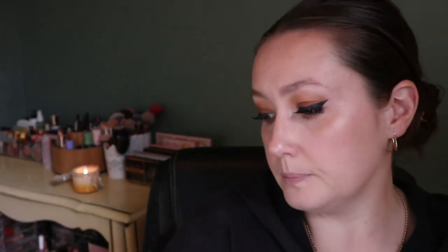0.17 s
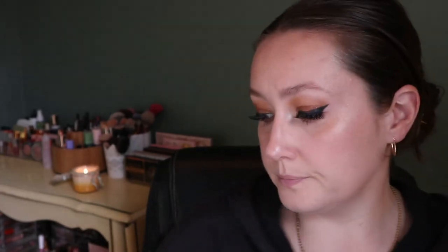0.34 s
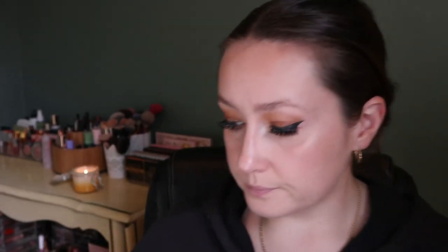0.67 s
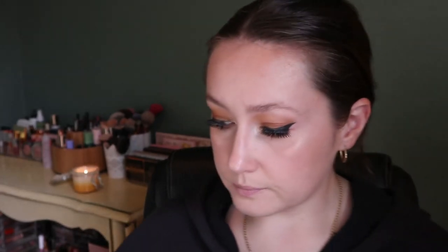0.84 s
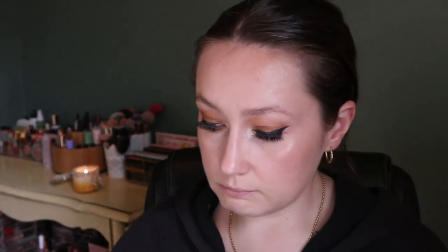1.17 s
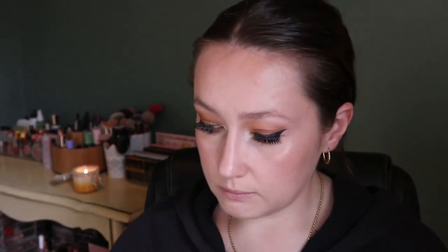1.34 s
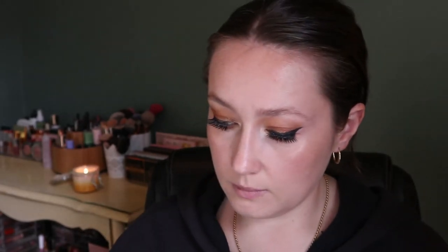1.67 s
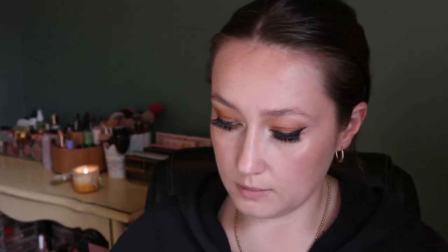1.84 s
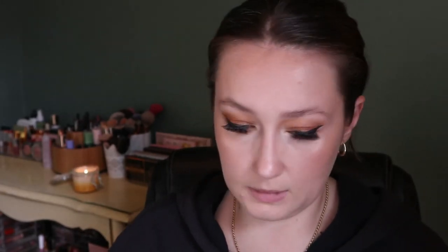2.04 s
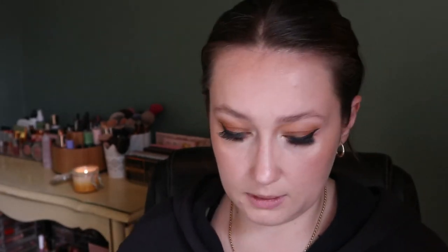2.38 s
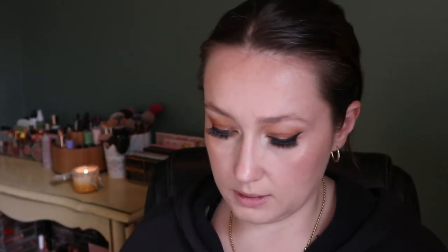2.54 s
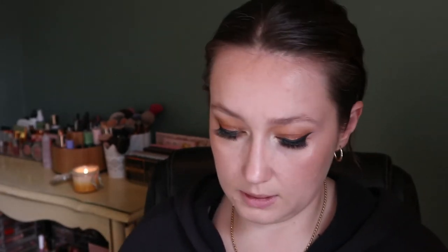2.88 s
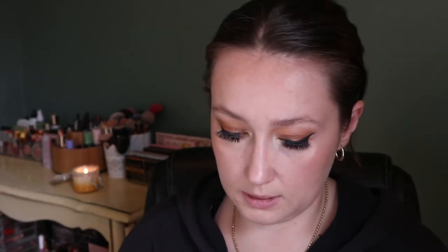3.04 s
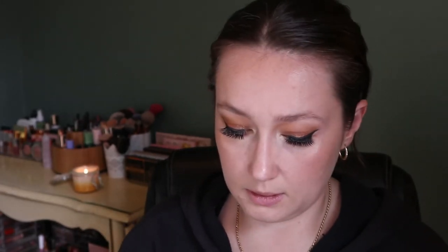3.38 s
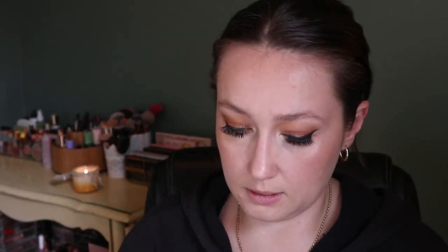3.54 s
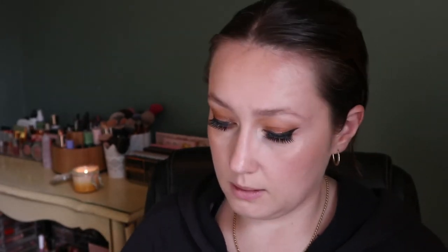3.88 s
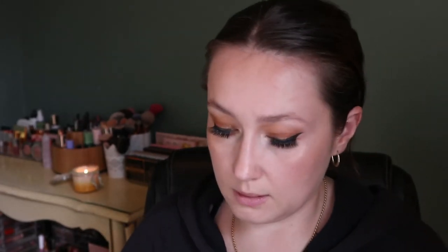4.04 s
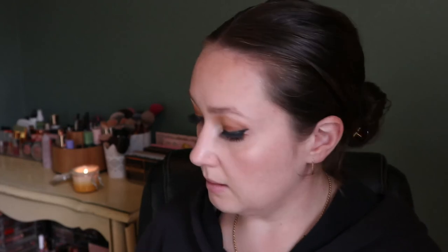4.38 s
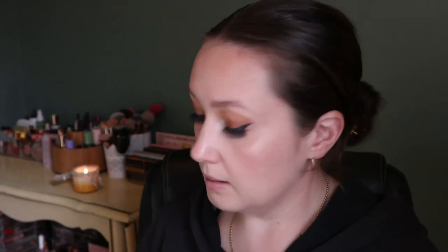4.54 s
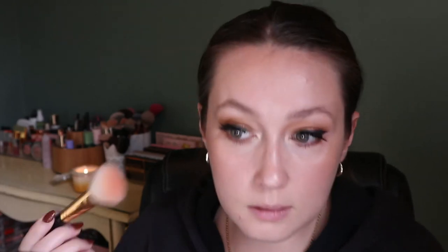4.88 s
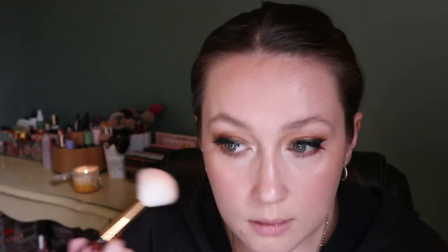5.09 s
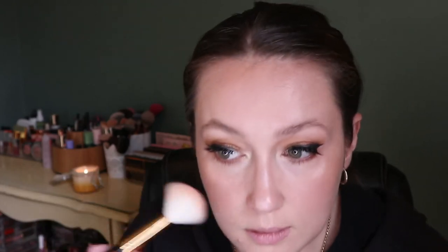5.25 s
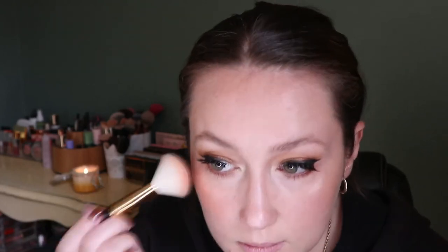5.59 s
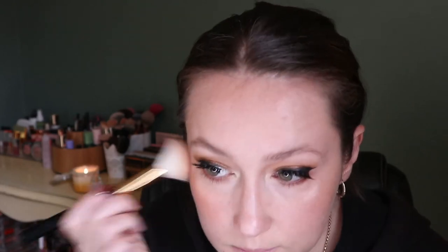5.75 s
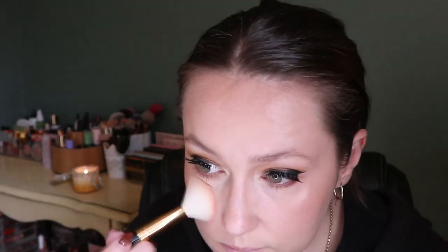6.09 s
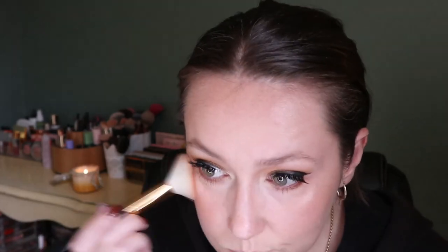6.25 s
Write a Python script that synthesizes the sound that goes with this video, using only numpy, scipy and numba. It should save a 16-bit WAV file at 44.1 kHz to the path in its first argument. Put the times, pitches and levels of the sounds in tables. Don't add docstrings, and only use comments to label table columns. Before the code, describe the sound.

In a small reverberant room with quiet ventilation hum, a case knocks twice and scrapes briefly, then a jar and tray rattle, drag and strike the table. A dull heavy blow leads to a sharp, clipped lid snap, the loudest sound. After a long quiet gap come soft nudges, two clear brush taps on a lid, a faint low chair shift with creaks, and soft pats. Close stereo microphone, lively echoes.

```python
import sys
import numpy as np
from scipy import signal
from scipy.fft import rfft, irfft
from scipy.io import wavfile
from scipy.ndimage import uniform_filter1d, minimum_filter1d
from numba import njit

SR = 44100
rng = np.random.default_rng(int(sys.argv[2]) if len(sys.argv) > 2 else 0)


def log_audio(samples):
    frames = np.atleast_2d(samples).T
    limited = np.clip(frames, -1, 1)
    pcm = np.round(limited * 32767).astype(np.int16)
    wavfile.write(sys.argv[1], SR, pcm)


def ratio(d):
    e = np.asarray(d, float) / 20
    return 10 ** e


N = 283122

# f/Hz, level/dB per Hz
HUM_SPECTRUM = [(15, -46), (25, -11.5), (90, -5), (118, 5), (146, -7), (237, -2.5), (529, -10), (673, -9.5),
                (1180, -13), (1350, -13.5), (1760, -14.5), (9020, -31.5), (15000, -47.5)]
# f/Hz, side minus mid level/dB
HUM_SIDE = [(60, -37), (110, -8), (200, -2), (380, 2.5), (700, 3.5), (1290, 3.5), (2380, 4), (4400, 6),
            (8120, 4), (15000, 9.5)]
HUM_DB, MAINS_HZ, MAINS_DB = -52.5, 120, -60.5
# f/Hz, T60/s
ROOM_T60 = [(100, 0.79), (300, 0.48), (1000, 0.63), (3000, 0.58), (7000, 0.73), (12000, 0.31)]
# f/Hz, side minus mid level/dB
PORTS_SIDE = [(60, -9), (110, -48), (200, -22), (380, -22), (700, -16.5), (1290, -14.5), (2380, -10.5),
              (4400, -1), (8120, 3.5), (15000, 8)]
# f/Hz, level/dB
MIC_RESPONSE = [(30, 4.5), (100, -6.5), (8000, 0.5), (12000, 1), (14000, -13.5), (17000, -41)]
# f/Hz, T60/s, level/dB
TABLE_BOOMS = [(126.6, 0.22, -42), (170.1, 0.18, -44)]

# f/Hz, width/Hz, level/dB
CHAIR_MODES = [(122, 7.7, 1), (314, 24, 0.5), (500, 91, -8.5), (870, 470, -7.5), (1900, 570, -23)]
SOFT_MODES = [(456, 670, -7.5), (913, 280, -1.5), (1150, 240, -1), (1700, 220, 2), (2350, 170, 0)]
BRUSH_MODES = [(471, 19, 12), (576, 184, 12), (790, 190, 1), (1197, 123, 7.5), (1650, 500, -12),
               (3050, 280, -14), (3880, 430, -35), (10400, 3000, -4)]
JAR_MODES = [(176, 17, -12), (634, 150, 3.5), (830, 229, -3), (2250, 410, -13.5), (3430, 400, -6),
             (5200, 230, -5.5)]
CASE_MODES = [(164.3, 24, 6.5), (226, 12, -0.5), (377, 24, 2.5), (560, 37, -6), (790, 54, -10),
              (1314, 1200, -9.5), (1622, 60, -1.5), (1927, 42, -1), (3400, 280, -16.5)]
TRAY_MODES = [(167, 29, 6), (343, 30, 0), (875, 90, 3), (922, 43, 8), (1834, 60, -2), (2020, 66, -2.5),
              (2900, 830, -0.5), (3400, 140, -19.5), (5070, 250, -15.5)]
LID_MODES = [(168, 35, 0.5), (560, 66, 6), (720, 260, 9.5), (933, 41, 13), (1644, 240, 1), (2480, 200, -8),
             (3050, 490, 0), (3920, 680, -16.5)]

EDGES_HZ = [90, 400, 1300, 2400, 5000, 16000]
# upper, higher, top part over mid, level/dB
CHAIR_TREBLE_DB = (-6, -8, -23)
PAT_TREBLE_DB = (-26, -21, -28)
NUDGE_TREBLE_DB = (-3.9, -11, -31.5)
BRUSH_TREBLE_DB = (-1.5, -9.5, -14.5)
JAR_TREBLE_DB = (-8, -0.93, -16)
CASE_TREBLE_DB = (-8.5, -6, -30)
TRAY_TREBLE_DB = (-3.3, 4.8, 1.5)
LID_TREBLE_DB = (1, -5, -15)
HARD_SHARE = (1, 0.33, 0.64)

# t/s, peak level/dB, weight (bass)/dB, hardness (treble)/dB
CHAIR_KNOCKS = [
    (4.953, -36.5, 4.5, 1.5),
    (4.975, -41.5, 9, 8),
    (5.0, -32.5, -4, -14),
]
PATS = [
    (6.064, -50, 9.5, 0),
    (6.304, -49, -6, 0.0041),
]
NUDGES = [
    (.608, -35, -2.5, -6),
    (.62, -36, -19.5, 3.5),
    (4.207, -43, -1, 3),
    (4.261, -39, -3.5, -5),
    (4.268, -33, -8, 3.5),
]
BRUSH_TAPS = [
    (4.459, -15, -17.5, 0),
    (4.6215, -16, -22, 0),
]
JAR_KNOCKS = [
    (1.0555, -13, -11, 0),
]
CASE_KNOCKS = [
    (.0435, -21, -9, 12.5),
    (.1015, -13, -3, -5.5),
]
TRAY_KNOCKS = [
    (.8965, -21, -10.5, 0.5),
    (1.154, -18.5, -2, 13),
    (1.403, -41.5, -23, 13.5),
    (1.586, -30.5, -6, 16),
    (1.615, -19.5, -6, 4),
    (1.6635, -10, -19, -17.5),
    (1.745, -30, -19, -5.5),
]
LID_SNAP = [
    (1.8796, 4, -14, 0),
]

# t/s, peak level/dB, ring f/Hz, ring decay/ms, top band over ring/dB
SEAT_STEPS = [
    (5.195, -42, 1750, 1.5, -30),
    (5.245, -48, 2060, 1.5, -30),
    (5.275, -53, 1750, 1.5, -28),
    (5.325, -52, 1770, 1.8, -28),
    (5.36, -52, 1650, 1.5, -30),
    (5.19, -51, 540, 9.3, -30),
]
CAP_TICKS = [(.739, -33, 1700, 0.66, -13.5), (.762, -35.5, 3580, 2, -7), (.836, -48, 3590, 1.1, -26),
             (1.77, -28.5, 3740, 2.5, -32), (1.163, -22.5, 2980, 1, -16), (.114, -20.5, 5200, 0.65, -1),
             (2.455, -33.5, 3800, 1.07, -42), (2.821, -47.5, 2020, 0.68, -31),
             (4.232, -42.5, 3680, 1.6, -27), (4.421, -44.5, 3640, 2, -17), (4.953, -45, 3700, 1.7, -5),
             (5.072, -34.5, 2080, 0.29, -27), (5.118, -33, 2100, 0.58, -37), (5.125, -54, 4560, 1.3, -25),
             (5.123, -56, 3450, 2.2, -25), (5.146, -34.5, 1780, 0.47, -34), (5.29, -57, 560, 28, -15),
             (5.29, -52, 2900, 1.5, -20), (5.469, -44, 1900, 2, -16), (5.472, -45, 3400, 0.48, -19)]
NEAR_TICKS = [(1.8, -21, 570, 1.5, -20), (1.664, -12, 850, 23, -34), (.103, -18, 380, 9.8, -29.5),
              (.104, -16.5, 794, 6, -30), (.1005, -12.5, 3240, 1, -20), (1.6, -12, 1650, 2, -7),
              (4.7, -36, 1700, 1.9, -25), (1.6635, -5, 2950, 2.6, -25), (2, -14, 2500, 1.2, -16),
              (6.064, -47, 820, 7.8, -40), (6.304, -44.5, 850, 8, -40), (4.459, -29, 10000, 0.65, -29),
              (4.6215, -29, 11500, 0.27, -33)]
NAIL_CLICKS = [
    (.0435, -14, 1250, 2.5, -30),
    (.1025, -11, 1650, 2.5, -15),
    (1.880, 1, 1620, 1.6, -25),
    (1.8815, -8, 3600, 1.2, -25),
    (2.302, -45, 9000, .3, -12),
    (2.4475, -25, 2800, .4, -24),
]

# hardest t/s, swell/s, fade/s, level/dB
CREAKS = [
    (4.999, 0.18, 0.11, -38),
    (5.13, .02, 0.18, -50.5),
    (5.26, 0.12, 0.22, -43),
    (5.49, 0.017, 0.081, -48),
]
THUMPS = [
    (4.97, 0.017, 0.34, -34.5),
    (5.15, .1, 0.098, -41.5),
    (5.47, 0.17, 1, -56),
]
# hardest t/s, swell/s, fade/s, level/dB, hardness/dB
CASE_DRAGS = [
    (.002, 0.0079, .02, -16, -18),
    (.065, 0.012, 0.13, -38.5, -9),
    (.118, 0.029, 0.039, -30.5, 26.5),
    (.17, 0.045, 0.24, -40, 1),
]
TRAY_DRAGS = [
    (0.763, 0.036, 0.66, -41, -6),
    (0.899, 0.037, 0.14, -23, 8),
    (.98, 0.11, 0.49, -35.5, -17),
    (1.058, 0.0049, 0.047, -21, 13),
    (1.166, 0.043, 0.077, -18, 4),
    (1.211, 0.035, 0.18, -35, 7),
    (1.294, 0.024, 0.053, -26.5, -14.5),
    (1.42, .05, 0.24, -51.5, 1.5),
]
TRAY_PULLS = [
    (1.59, 0.0037, 0.069, -34, 6),
    (1.62, 0.0046, 0.16, -26, 6),
    (1.668, 0.014, 0.57, -26.5, -7.5),
    (1.749, 0.015, .2, -36.5, 6),
]
# bass, upper, top part over mid, level/dB
CASE_DRAG_DB = (1, 6, -26.5)
TRAY_DRAG_DB = (-4, 0.99, -6.5)
TRAY_PULL_DB = (-13, 0, -7.5)
DRAG_END_S = (.56, 1.56, 1.875)
DRAG_HARD_SHARE = 0.21
SPAN_DB = 20


def unit(x):
    return x / np.sqrt(np.mean(x ** 2))


def band(x, lo_hz, hi_hz):
    return signal.sosfilt(signal.butter(2, [lo_hz, hi_hz], "band", fs=SR, output="sos"), x)


def colour(x, table):
    hz, db = np.transpose(table)
    n = x.shape[-1]
    f = np.arange(n // 2 + 1) * SR / n
    gain = ratio(np.interp(np.log(f + 1), np.log(hz), db))
    return irfft(rfft(x) * gain, n)


def walk(rate_hz):
    k = int(SR / rate_hz)
    held = np.repeat(rng.standard_normal(N // k + 1), k)
    return unit(uniform_filter1d(uniform_filter1d(held, k), k)[:N])


def split(x):
    return [(-1) ** k * band(x, lo, hi) for k, (lo, hi) in enumerate(zip(EDGES_HZ, EDGES_HZ[1:]))]


def add(out, s, x):
    i = int(s * SR)
    out[i:i + len(x)] += x[:N - i]


def hum():
    mid, side = colour(rng.standard_normal((2, N)), HUM_SPECTRUM) * ratio(.5 * walk(4))
    mains_phase = 2 * np.pi * np.cumsum(MAINS_HZ + 1.5 * walk(5)) / SR
    mains = ratio(3.0 * walk(8)) * np.sin(mains_phase)
    scale = ratio(HUM_DB) / np.sqrt(np.mean(mid ** 2))
    return np.array([scale * mid + ratio(MAINS_DB) * mains, scale * colour(side, HUM_SIDE)])


def room(build_s=0.0018, early_db=5, early_s=0.061):
    t = np.arange(SR) / SR
    hz, t60 = np.transpose(ROOM_T60)
    tail = 0
    grain = ratio(2.0 * rng.standard_normal((2, SR)) * np.exp(-t / 0.2))
    for centre_hz in 45 * 2 ** np.arange(0, 8.6, .5):
        t60_s = np.interp(np.log(centre_hz), np.log(hz), t60)
        decay = np.exp(-np.log(1000) * t / t60_s)
        noise = grain * rng.standard_normal((2, SR))
        tail = tail + decay * band(noise, centre_hz / 2 ** .25, centre_hz * 2 ** .25)
    tail = tail * ratio(early_db * np.exp(-(t / early_s) ** 4))
    power = np.abs(rfft(tail)) ** 2
    flatten = np.sqrt(uniform_filter1d(power, size=900) / uniform_filter1d(power, size=70))
    tail = irfft(rfft(tail) * flatten)
    tail = tail * (1 - np.exp(-(t / build_s) ** 2)) * (t < .8)
    return tail / np.sqrt(np.sum(tail ** 2, axis=1, keepdims=True))


def table_top(x):
    t = np.arange(SR // 2) / SR
    boom = 0
    for hz, t60_s, db in TABLE_BOOMS:
        boom = boom + ratio(db) * np.exp(-np.log(1000) * t / t60_s) * np.sin(2 * np.pi * hz * t)
    return signal.fftconvolve(x, boom)[:N]


def grit(rate_hz, spread_db):
    when, size, sign = rng.random(N), rng.exponential(size=N), rng.standard_normal(N)
    return (when < rate_hz / SR) * ratio(spread_db * np.minimum(size, 2)) * sign


def effort(s, swell_s, fade_s, db):
    t = np.arange(N) / SR - s
    return ratio(db - SPAN_DB * np.where(t < 0, -t / swell_s, t / fade_s))


def chair_shift():
    slips = grit(rate_hz=380, spread_db=14.0)
    creak = unit(band(slips, 1710, 2250)) + ratio(-8) * unit(band(slips, 2650, 3100))
    thump = unit(band(slips, 90, 200))
    creaks = creak * sum(effort(*row) for row in CREAKS)
    thumps = thump * sum(effort(*row) for row in THUMPS)
    return ratio(-14.0) * (creaks + thumps)


def ticks(table):
    out, t = np.zeros(N), np.arange(1500) / SR
    click = band(np.exp(-t / .00003), 4100, 12900)
    click = click / click.max()
    for s, db, hz, ms, top_db in table:
        tone = np.exp(-1000 * t / ms) * np.sin(2 * np.pi * hz * t)
        add(out, s, ratio(db) * (tone + ratio(top_db) * click))
    return out


def ring(modes, crack_db, detune):
    size = 8192
    f = np.arange(size // 2 + 1) * SR / size
    hz, width_hz, db = (c[:, None] for c in np.transpose(modes))
    hz = hz * (1 + detune * rng.standard_normal(hz.shape))
    power = np.sum(ratio(2 * db) / (1 + (2 * (f - hz) / width_hz) ** 2), axis=0)
    crack = ratio(2 * crack_db) / (1 + (f / 2500) ** 2 + (500 / (f + 1)) ** 2)
    power = power / power.max() + crack
    cepstrum = irfft(.5 * np.log(power))
    cepstrum[1:size // 2] *= 2
    cepstrum[size // 2 + 1:] = 0
    return irfft(np.exp(rfft(cepstrum)))


def slides():
    out, slips = 0, grit(rate_hz=400, spread_db=5.0)
    drags = [(CASE_DRAGS, CASE_MODES, CASE_DRAG_DB), (TRAY_DRAGS, TRAY_MODES, TRAY_DRAG_DB),
             (TRAY_PULLS, TRAY_MODES, TRAY_PULL_DB)]
    for (table, modes, (bass_db, upper_db, top_db)), end_s in zip(drags, DRAG_END_S):
        body = ring(modes, crack_db=-21.0, detune=.001)
        bass, mid, upper, higher, top = split(signal.fftconvolve(slips, body)[:N])
        dull = unit(mid) + ratio(bass_db) * unit(bass)
        upper, top = unit(upper + higher), unit(top)
        sounding = np.clip((end_s - np.arange(N) / SR) / .02, 0, 1)
        for *push, hard_db in table:
            bright = ratio(upper_db + DRAG_HARD_SHARE * hard_db) * upper + ratio(top_db + hard_db) * top
            out = out + sounding * effort(*push) * ratio(-11) * (dull + bright)
    return out


def knocks(table, modes, treble_db, crack_db):
    out = np.zeros(N)
    for s, db, bass_db, hard_db in table:
        parts = split(ring(modes, crack_db, detune=0.025))
        bright_db = np.array(treble_db) + hard_db * np.array(HARD_SHARE)
        above_db = [bass_db, 0, *bright_db]
        add(out, s, sum(ratio(db + rel) * p / np.abs(p).max() for rel, p in zip(above_db, parts)))
    return out


def scene():
    # (sound, room over direct/dB)
    sources = [
        (chair_shift(), 6),
        (ticks(SEAT_STEPS), 11),
        (knocks(CHAIR_KNOCKS, CHAIR_MODES, CHAIR_TREBLE_DB, crack_db=-9), 9),
        (knocks(PATS, SOFT_MODES, PAT_TREBLE_DB, crack_db=-22), 2.5),
        (knocks(NUDGES, SOFT_MODES, NUDGE_TREBLE_DB, crack_db=-11.0), 14),
        (ticks(CAP_TICKS), 11),
        (ticks(NEAR_TICKS), -3),
        (ticks(NAIL_CLICKS), -3),
        (knocks(BRUSH_TAPS, BRUSH_MODES, BRUSH_TREBLE_DB, crack_db=-25.5), 11),
        (slides(), 8),
        (knocks(JAR_KNOCKS, JAR_MODES, JAR_TREBLE_DB, crack_db=-24.5), 9),
        (knocks(CASE_KNOCKS, CASE_MODES, CASE_TREBLE_DB, crack_db=-18.0), 9),
        (knocks(TRAY_KNOCKS, TRAY_MODES, TRAY_TREBLE_DB, crack_db=-18.0), 8),
        (knocks(LID_SNAP, LID_MODES, LID_TREBLE_DB, crack_db=-19.5), 8)]
    direct = sum(x for x, wet_db in sources)
    direct = direct + .7 * np.roll(direct, int(.0013 * SR)) - .6 * np.roll(direct, int(.0026 * SR))
    send = sum(ratio(wet_db) * x for x, wet_db in sources)
    wet = signal.fftconvolve(send[None], room(), axes=1)[:, :N]
    slant = 0.65 * np.gradient(colour(direct, [(100, 35.4), (10000, 5.8)]))
    near_mid = direct + table_top(direct) + wet[0]
    near_side = colour(slant + wet[1], PORTS_SIDE)
    mid, side = colour(np.array([near_mid, near_side]), MIC_RESPONSE) + hum()
    return np.array([mid + side, mid - side])


@njit
def follow(x, attack, release):
    e, out = 0., np.empty(len(x))
    for i in range(len(x)):
        e += (x[i] - e) * (attack if x[i] > e else release)
        out[i] = e
    return out


def band_limit(x):
    return signal.sosfilt(signal.butter(12, 16280, fs=SR, output="sos"), x)


def record(dry):
    peak = np.abs(dry).max(axis=0)
    over_db = np.clip(20 * np.log10(peak / .7 + 1e-9), 0, 9)
    held_db = np.roll(-minimum_filter1d(-over_db, size=441), 220)
    duck_db = follow(held_db, 1 / (.004 * SR), 1 / (.75 * SR))
    return band_limit(np.clip(dry * ratio(-1.1 * duck_db), -1, 1))


dry = scene()
out = record(dry)
log_audio(out)
```